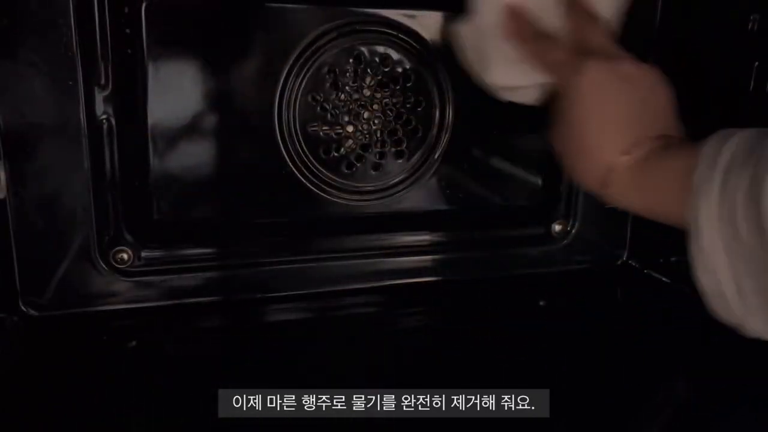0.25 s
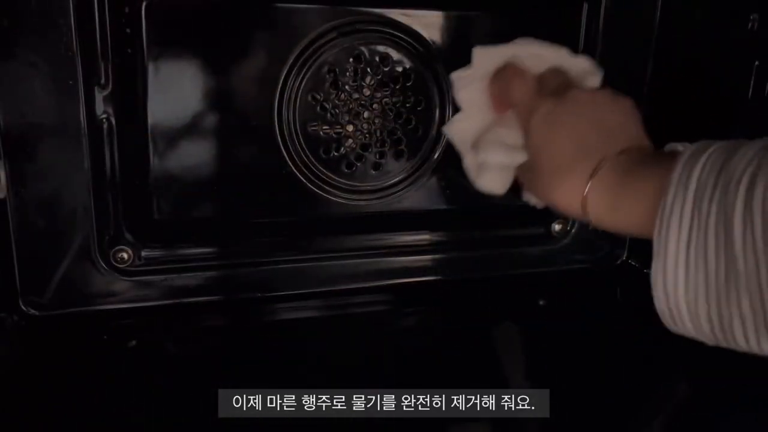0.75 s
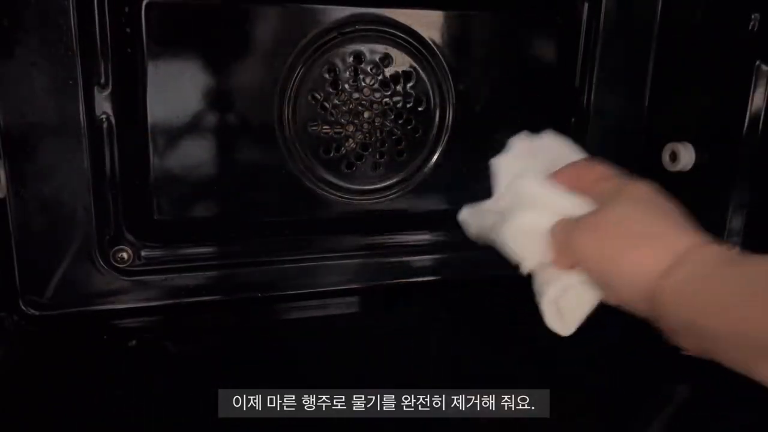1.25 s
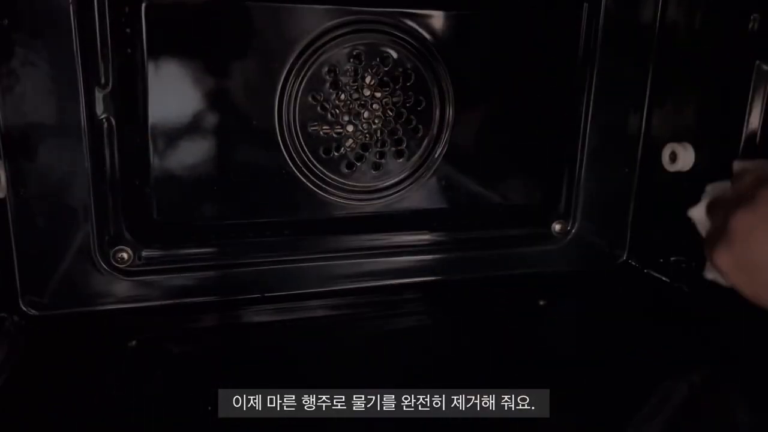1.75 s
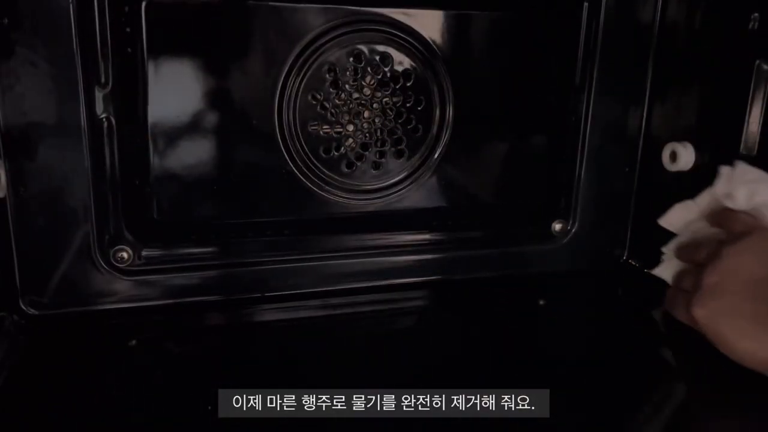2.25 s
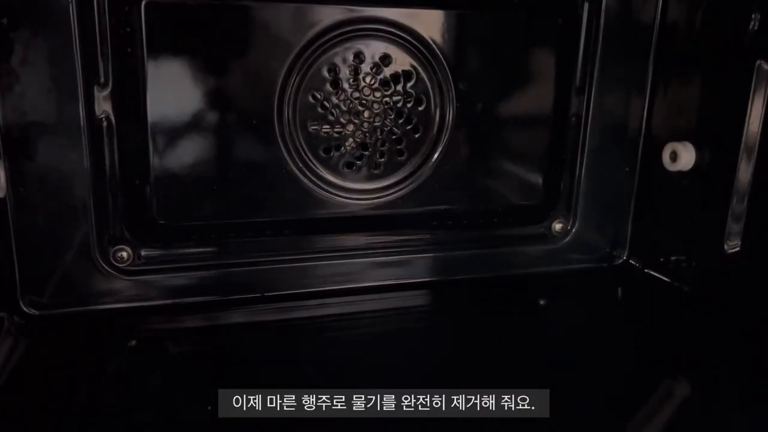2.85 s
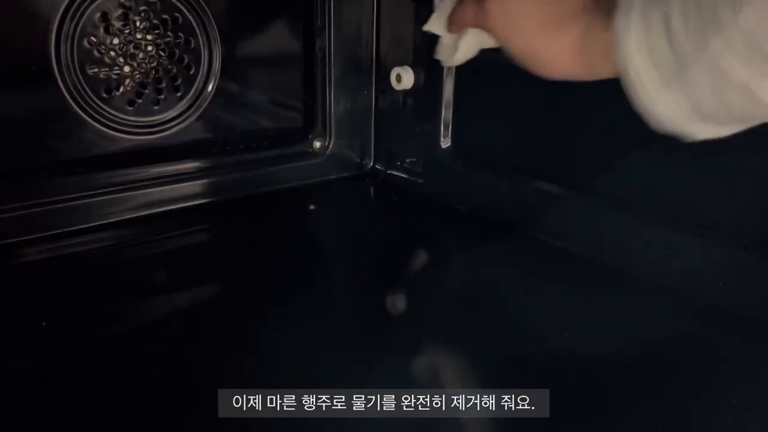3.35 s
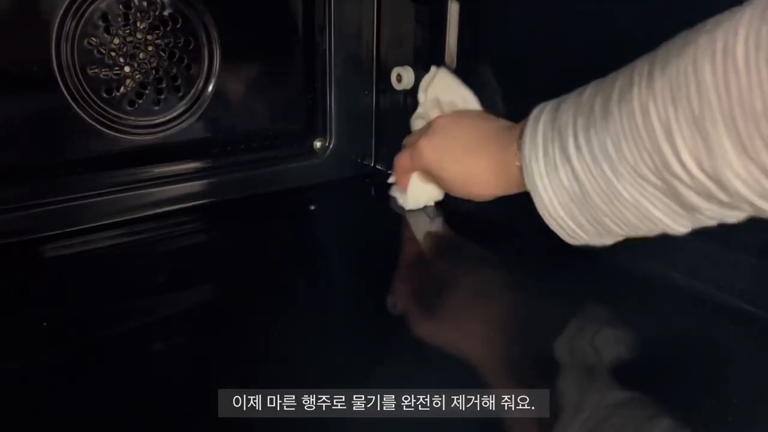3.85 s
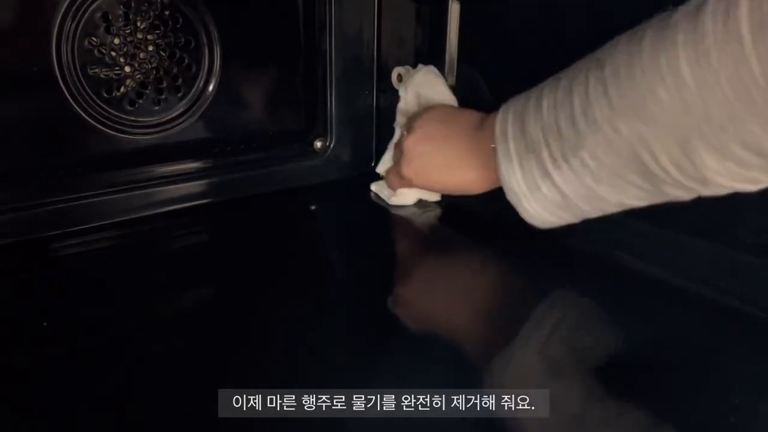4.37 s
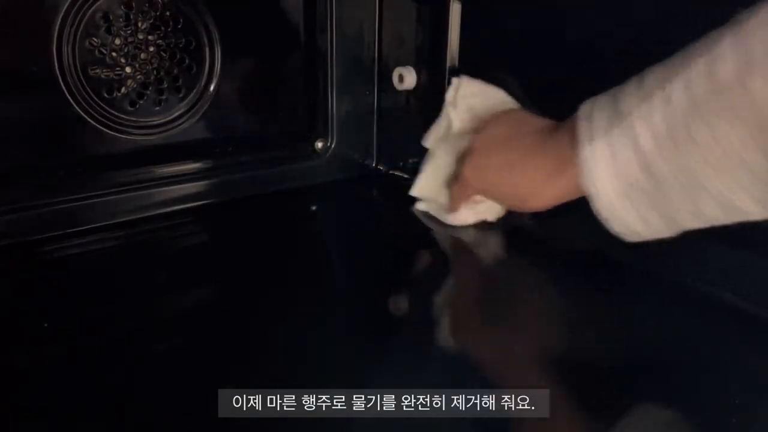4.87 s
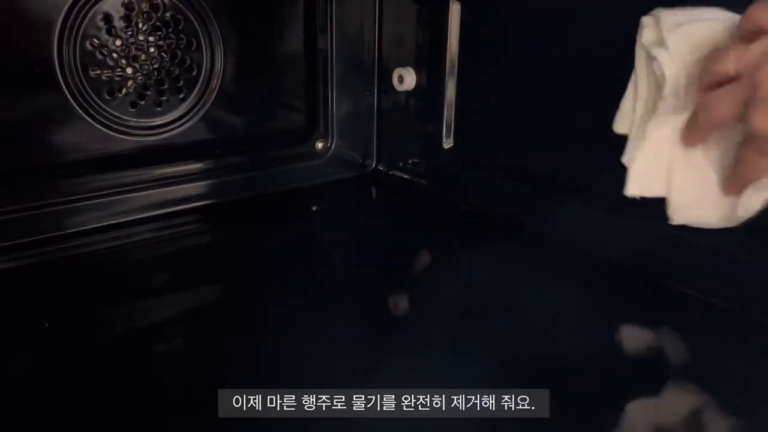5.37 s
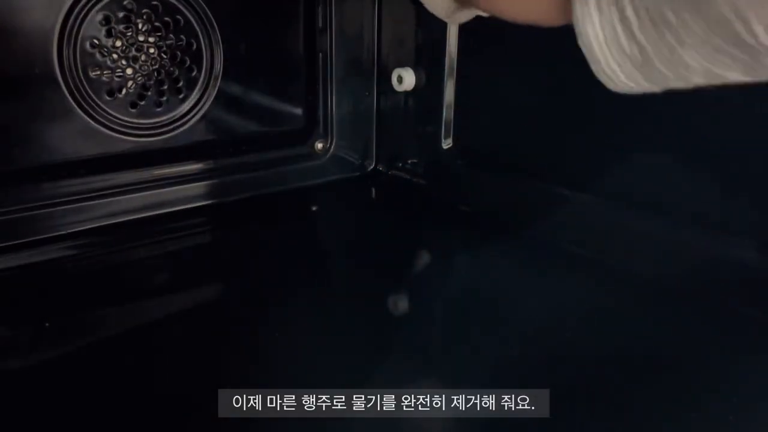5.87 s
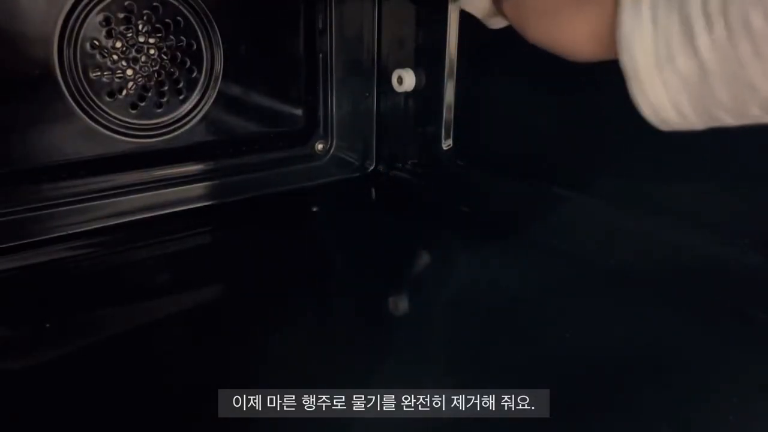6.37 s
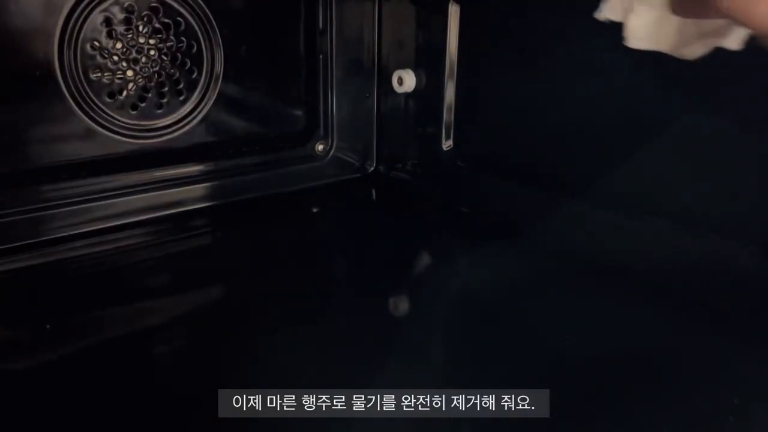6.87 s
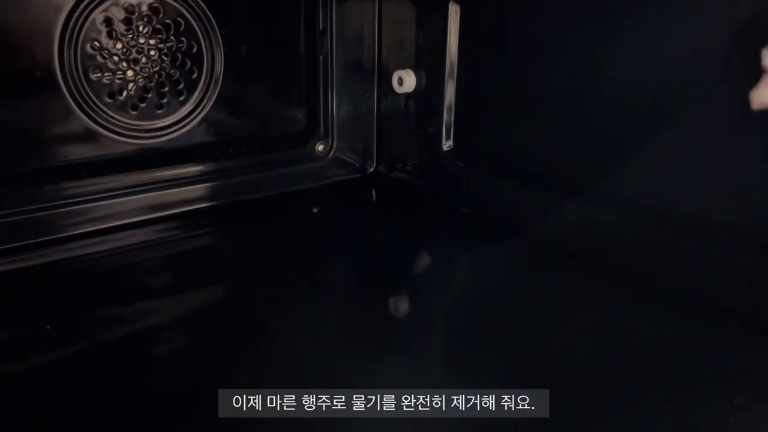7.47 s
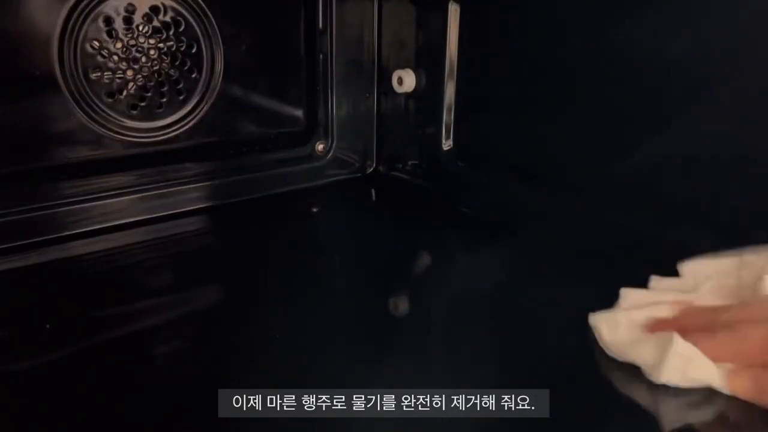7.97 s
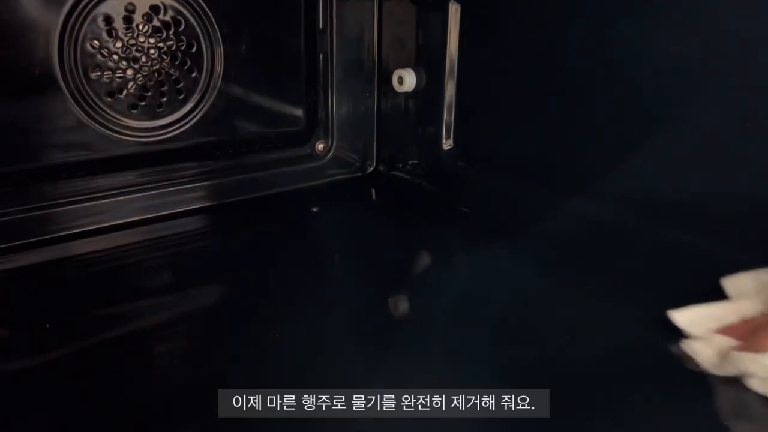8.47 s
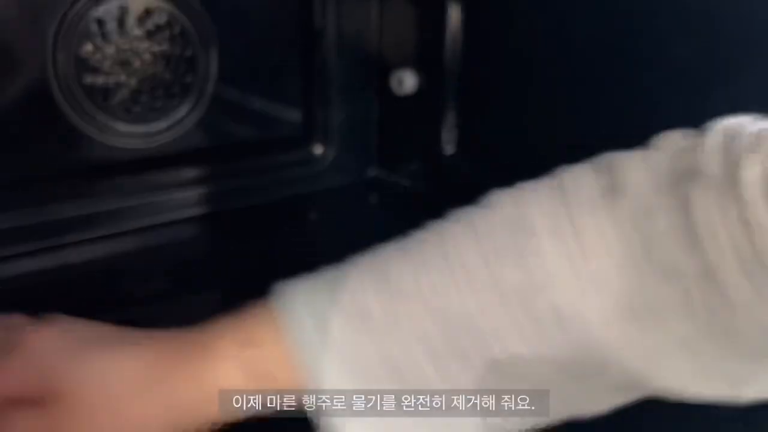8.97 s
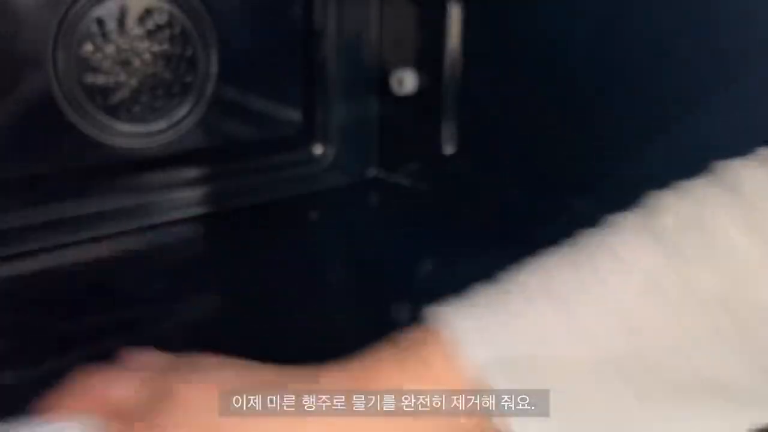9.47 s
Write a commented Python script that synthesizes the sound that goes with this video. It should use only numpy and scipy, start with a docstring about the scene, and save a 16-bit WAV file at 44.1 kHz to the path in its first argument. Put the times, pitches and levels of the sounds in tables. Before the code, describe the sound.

A dry cloth rubs the inside of an enamelled metal oven in short hissing strokes, with hollow bumps, a sharp slap and one heavy thud.

```python
"""Inside an enamelled steel oven, a dry cloth wiped by hand, two microphone ports close by, still kitchen behind.
From the start, strokes of slipping fibres hiss and rumble the panels; folds scuff and snap, fibres whistle,
and the padded hand bumps the walls. Near 2.9 s a hard catch comes with a slap on the ringing side wall.
Near 6.7 to 7 s the hand scrapes and rings the roof; near 8 s it thuds heavily on the floor of the oven,
near 8.6 s something hard on it taps the enamel, and wiping goes on to the end."""
import sys
import numpy as np
from scipy import signal
from scipy.fft import rfft, irfft, next_fast_len
from scipy.io import wavfile
from scipy.ndimage import uniform_filter1d

SR = 44100
rng = np.random.default_rng(int(sys.argv[2]) if len(sys.argv) > 2 else 0)


def store_pcm(level_fs):
    """Save levels as 16-bit WAV."""
    pcm = np.round(np.clip(level_fs, -1, 1) * 32767).astype(np.int16)
    wavfile.write(sys.argv[1], SR, np.atleast_2d(pcm).T)


N = 429093
TIME = np.arange(N) / SR


def undb(db):
    """Decibels to gain."""
    return 10 ** (np.asarray(db) / 20)


def unit(x):
    """Scale to rms 1."""
    return x / np.sqrt(np.mean(x ** 2))


def shape(points, hz):
    """Gain of a (Hz, dB) spectrum at given frequencies, interpolated over log frequency."""
    knots, db = np.transpose(points)
    return undb(np.interp(np.log(hz + 1), np.log(knots), db))


def filtered(x, response):
    """Pass x through a response given as a function of frequency."""
    size = next_fast_len(x.shape[-1] + 8192)
    hz = np.arange(size // 2 + 1) * SR / size
    return irfft(rfft(x, size) * response(hz), size)[..., :x.shape[-1]]


def colour(x, points):
    """Give x a smooth spectrum."""
    return filtered(x, lambda hz: shape(points, hz))


def resonate(x, peaks):
    """Parallel resonances, each applied twice for steep skirts."""
    def response(hz):
        total = 0
        for f, width, db in peaks:
            once = 1j * hz * 1.5 * width / (f * f - hz * hz + 1j * hz * 1.084 * width)
            total = total + undb(db) * once ** 2
        return total
    return filtered(x, response)


def ring(modes, t, scatter=1):
    """Decaying modes after a blow, peak 1; with no scatter they all start from rest together."""
    y = np.zeros(len(t))
    for hz, db, t60 in modes:
        phase = scatter * rng.random()
        y += undb(db - 60 * t / t60) * np.sin(2 * np.pi * (hz * t + phase))
    return y / np.abs(y).max()


def add(track, s, sound):
    """Mix a sound into a track at time s."""
    i = max(int(s * SR), 0)
    track[i:i + len(sound)] += sound[:N - i]


def walk(rate):
    """Smooth random wander with a spread near 1, given new targets at a rate per second."""
    knots = rng.standard_normal(4096)
    return 1.27 * np.interp(TIME * rate, np.arange(len(knots)), knots)


def slips(rate, spread_db, size):
    """Tiny stick-slip clicks of uneven strength, rate per second, rms 1."""
    hit = rng.random(size) < rate / SR
    return unit(hit * rng.standard_normal(size) * undb(spread_db * rng.standard_normal(size)))


def speed(start, length, fastest):
    """In each stroke the hand speeds up from rest to 1 and slows to rest again."""
    crest = start + length * np.clip(fastest, .05, .95)
    return np.sin(np.pi / 2 * np.interp(TIME, [start, crest, start + length], [0, 1, 0]))


# Strokes of the cloth over the enamel. Each row: start in seconds, length in seconds, fastest point as a share
# of the length, fibre hiss in dB, then relative to it in dB: finest fibres, drag in the cavity, load on the wall.
STROKES = [(-0.08, 0.32, 0.22, -58.5, 1, 1.5, 1.5), (0.224, 0.51, 0.64, -60, -1, 2.5, 7),
           (0.687, 0.2, 0.38, -57.5, -2, 0.5, 4), (0.852, 0.31, 0.54, -60, -2.5, 2, 4.5),
           (1.095, 0.4, 0.13, -68.5, 8.5, 2.5, 8), (1.41, 0.49, 0.24, -61.5, 0, 0.5, 5),
           (1.796, 0.26, 0.19, -70, 5, 2.5, 8), (1.96, 0.17, 0.88, -68, -5, 11, 9),
           (2.04, 0.32, 0.31, -61.5, 2.5, -1, 5.5), (2.285, 0.74, 0.21, -59.5, 2, 1.5, 4),
           (2.728, 0.31, 0.12, -63, 0, 3, 4), (3.011, 0.26, 0.059, -64.5, 4.5, -6, -23),
           (3.173, 0.35, 0.53, -65.5, 1.5, 2, -18), (3.513, 0.2, 0.5, -60, 1, 5.5, 9),
           (3.613, 0.51, 0.94, -62, -2, 2.5, 5), (4.097, 0.37, 0.18, -61, -3.5, 2.5, 8),
           (4.456, 0.43, 0.45, -66.5, -1, 7.5, 7.5), (4.77, 0.91, 0.27, -60.5, -3, 1, 3.5),
           (5.382, 0.39, 0.72, -57.5, -0.5, 2, 4.5), (5.746, 0.3, 0.08, -76.5, 7.5, 10, 14),
           (5.959, 0.16, 0.24, -64.5, 0, -14, 9.5), (6.106, 0.54, 0.6, -63, -3, 0, 5),
           (6.647, 0.087, 0.4, -60.5, 8.5, 7, 8), (6.7, 0.65, 0.22, -68.5, 0, 5.5, 11),
           (7.19, 0.38, 0.94, -59.5, -4.5, -2.5, 2.5), (7.548, 0.25, 0.47, -64.5, 6.5, 8, 7),
           (7.902, 0.32, 0.29, -61, 3, 4, 11.5), (8.198, 0.33, 0.7, -59.5, 1.5, 1.5, 7),
           (8.439, 0.41, 0.54, -56.5, -1.5, 1, 0.5), (8.8, 0.27, 0.87, -56.0, 0.5, -3.5, -5),
           (9.036, 0.35, 0.3, -56.0, 0, -1.5, 2), (9.272, 0.32, 0.35, -55, 0.5, -5.5, -3),
           (9.556, 0.33, 0.39, -55.5, 2, -1, -1)]
# hiss and drag grow with the hand's speed to this power; the walls shake even when it is slow
RUB_POWER, LOAD_POWER = 0.62, 0.27
# the cloth rustles faintly in the hand even between strokes
REST_FINE_DB, REST_DRAG_DB, REST_LOAD_DB = -72, -83, -71.5


def effort():
    """Gains of hiss, finest fibres, drag and wall load: each follows the hand's speed, stroke by stroke."""
    hiss = np.zeros(N)
    fine, drag, load = (np.full(N, undb(db) ** 2) for db in (REST_FINE_DB, REST_DRAG_DB, REST_LOAD_DB))
    for start, length, fastest, db, fine_db, drag_db, load_db in STROKES:
        v = speed(start, length, fastest)
        moving = v > 0
        rub = undb(db) * v[moving] ** RUB_POWER
        push = undb(db) * v[moving] ** LOAD_POWER
        # overlapping strokes add as power
        hiss[moving] += rub ** 2
        fine[moving] += (rub * undb(fine_db)) ** 2
        drag[moving] += (rub * undb(drag_db)) ** 2
        load[moving] += (push * undb(load_db)) ** 2
    return np.sqrt([hiss, fine, drag, load])


# Hiss of the slipping fibres, then of the finest. Each row: frequency in Hz, density in dB per Hz.
FIBRE_SPECTRUM = [(600, -12.5), (1000, 2.5), (1500, 2), (2000, 4.5), (2800, 5.5), (3800, 2), (5200, -1),
                  (7000, -8.5), (9000, -16.5), (16000, -41)]
FINE_FIBRE_SPECTRUM = [(4000, -6), (6500, 0.5), (8500, 0.5), (9300, 5.5), (10200, 1), (11300, 1),
                       (12400, 4), (14700, 3.5), (16000, -6)]
# Resonances under the cloth: air in the cavity, wall chatter, panel boom.
# Each row: frequency in Hz, nominal width in Hz, relative level in dB.
CAVITY = [(533, 113, 5.5), (611, 156, -2), (800, 98, 2.5), (950, 130, 0.5), (1170, 250, -7.5),
          (1258, 490, -6.5)]
CHATTER = [(227.5, 48, 2.5), (287.6, 38, 3), (320.5, 69, 5), (363, 79, -2.5), (431, 12, 1.5)]
BOOM = [(84, 65, -2.5), (117.7, 24.7, 2.5), (156.5, 6.1, -4.5), (194.6, 7.7, -8)]
# the panels' boom against their chatter, and its uneven swell as the wad rolls
BOOM_DB, BOOM_SWELL_DB, ROLL_PER_S = 2, -1, 7.1


def wiping():
    """Fibres hiss as they slip; the uneven drag of the wad shakes the walls and the air between them."""
    hiss_gain, fine_gain, drag_gain, load_gain = effort()
    grip = walk(35)
    fibres = slips(16000, 0.96, N) * undb(0.7 * grip)
    drag = slips(4000, 1.8, N) * undb(1.0 * grip)
    hiss = unit(colour(fibres, FIBRE_SPECTRUM)) * hiss_gain
    fine = unit(colour(fibres, FINE_FIBRE_SPECTRUM)) * fine_gain * undb(-0.25)
    hollow = unit(resonate(drag, CAVITY)) * drag_gain
    chatter = unit(resonate(drag, CHATTER)) * load_gain
    swell = undb(BOOM_DB + BOOM_SWELL_DB * walk(ROLL_PER_S))
    boom = unit(resonate(drag, BOOM)) * load_gain * swell
    return hiss + fine + hollow + chatter + boom


# Strokes that sing in one resonance.
# Each row: start in seconds, end in seconds, frequency in Hz, nominal width in Hz, level in dB.
SWISHES = [(0.071, 0.184, 800, 350, -58), (0.397, 0.42, 756, 150, -32.5), (0.431, 0.69, 650, 378, -54),
           (2.099, 2.42, 5870, 1200, -68), (2.854, 2.896, 960, 1140, -34), (2.86, 2.892, 3200, 2800, -39),
           (2.862, 2.908, 580, 330, -36), (2.88, 2.964, 1080, 800, -42.5),
           (3.737, 3.908, 5040, 1100, -62.5), (3.868, 4.047, 5070, 1500, -58),
           (4.039, 4.067, 2200, 1800, -52.5), (4.06, 4.6, 1370, 1500, -68.5),
           (4.237, 4.403, 13800, 2200, -58), (4.85, 5.7, 1123, 110, -65), (5.052, 5.805, 1590, 1310, -66),
           (5.404, 5.785, 2700, 450, -60.5), (5.946, 6.544, 5700, 1420, -68.5),
           (7.237, 7.435, 4460, 2500, -68), (7.615, 7.8, 1293, 90, -60), (7.949, 7.989, 1100, 1600, -41),
           (8.599, 8.8, 1300, 500, -60), (8.663, 8.8, 56.7, 35, -45), (9.233, 9.493, 4800, 1190, -59)]


def swishes():
    """The pocket between hand and wall picks one band out of the rubbing for the length of a stroke."""
    out, t = np.zeros(N), TIME[:SR]
    for start, end, hz, width, db in SWISHES:
        rub = unit(resonate(slips(12000, 0.85, SR), [(hz, width, 0)]))
        arch = np.sin(np.pi * np.clip(t / max(end - start, .02), 0, 1))
        add(out, start, undb(db) * arch * rub)
    return out


# The cloth catches and scuffs. Each row: start in seconds, level in dB, hollow pitch in Hz,
# wall chatter and hiss in relative dB before trims, decay of the hiss by 60 dB in seconds.
SCUFFS = [(0.129, -49, 900, -13, 4.5, 0.13), (0.244, -35.5, 790, -18, -17, 0.06),
          (0.284, -42, 790, -20, -21, 0.051), (0.303, -45, 820, -20, -20, 0.06),
          (0.342, -48, 1000, -13, -11, 0.06), (0.347, -45.5, 620, 7, -14, 0.089),
          (0.397, -39, 690, 3.5, -10, 0.09), (0.412, -39.5, 696, 3.5, -16, 0.1),
          (0.452, -46, 560, 4, -18, 0.1), (0.537, -43, 664, 2, -14, 0.12),
          (0.563, -46, 675, 3.5, -20, 0.08), (1.056, -44.5, 730, -0.5, -7, 0.1),
          (1.312, -48.5, 1170, 6.5, -8, 0.19), (1.457, -61.5, 694, 12.5, 0, 0.45),
          (1.536, -65.5, 634, 21, 9, 0.26), (2.021, -50.5, 633, 13, -3, 0.037),
          (2.077, -45.5, 877, -5, -11, 0.065), (2.128, -47, 795, 5.5, -1.5, 0.16),
          (2.156, -47.5, 720, 16, -6, 0.055), (2.747, -53, 1200, -22, -3, 0.06),
          (2.876, -19, 560, -10.5, -8, 0.081), (2.909, -35, 1060, -12, -15, 0.19),
          (2.944, -38, 700, -14, -28, 0.15), (3.393, -56, 900, 13.5, -18, 0.23),
          (3.535, -52.5, 620, 10.5, -16, 0.087), (3.84, -55, 604, 9.5, -12, 0.087),
          (4.06, -44, 640, 7.5, -15, 0.089), (4.211, -52, 700, 6, -12, 0.099),
          (4.734, -64, 595, 19, -8, 0.081), (6.668, -36, 510, -6, -27, 0.15),
          (6.912, -55, 504, -10, -20, 0.18), (7.715, -44, 660, -14, -22, 0.06),
          (7.754, -40, 675, -6.5, -23, 0.094), (7.816, -45.5, 636, -5, -25, 0.07),
          (7.88, -42.5, 626, -4, -16.5, 0.15), (7.929, -36.5, 665, -12, -30, 0.4),
          (7.963, -28.5, 410, -0.5, -18.5, 0.12)]
# Hiss of a scuff. Each row: frequency in Hz, density in dB per Hz.
SCUFF_SPECTRUM = [(400, -6), (1000, 11), (2200, 17.5), (3100, 17.5), (4500, 11), (7000, 7.5), (9500, 14),
                  (13000, 8), (16000, 9.5)]


def scuffs():
    """A fold catches and lets go: a burst of slips, whose hollow part and wall chatter outlast its hiss."""
    out, t = np.zeros(N), TIME[:SR // 2]
    onset = 1 - np.exp(-t / 0.0019)
    for s, db, hz, chatter_db, hiss_db, t60 in SCUFFS:
        fade_db = -60 * t / t60
        rub = slips(8000, 2.3, len(t))
        chatter = unit(resonate(rub, CHATTER)) * undb(0.8 * fade_db + chatter_db + 2)
        hollow = unit(resonate(rub, [(hz, 0.39 * hz, 0)])) * undb(0.85 * fade_db - 4.0)
        hiss = unit(colour(rub, SCUFF_SPECTRUM)) * undb(fade_db + hiss_db)
        add(out, s, undb(db) * onset * (chatter + hollow + hiss))
    return out


# The hand bumps a panel. Each row: start in seconds, level in dB, settled panel pitch in Hz,
# time to the fullest contact in seconds, after-ring in relative dB before trims.
BUMPS = [(0.003, -37.5, 105, 0.0081, 8), (0.614, -32.5, 104, 0.014, -2), (1.051, -38.5, 105, 0.011, -13),
         (1.32, -27.5, 105.3, 0.019, 5), (1.477, -42, 113, 0.012, 12), (1.57, -35, 122.6, 0.018, 12),
         (1.934, -44, 120, 0.015, -11), (2.141, -34, 113, 0.014, 0), (2.203, -35, 114, 0.012, -15),
         (2.302, -40, 112, 0.013, -4), (2.775, -33.5, 99, 0.021, 11.5), (2.962, -38.5, 111, 0.011, -12),
         (3.086, -49, 118, 0.017, 1), (3.173, -47.5, 122.5, 0.027, -6), (3.397, -36.5, 114, 0.017, -2),
         (4.064, -41, 119.3, 0.017, -14), (5.058, -43.5, 119, 0.022, 6), (5.865, -39, 90, 0.024, -2),
         (6.034, -46, 106, 0.015, -2), (7.963, -3.5, 124, 0.017, 1), (8.083, -30, 121, 0.015, -16),
         (8.129, -30.5, 104, 0.0069, -15), (8.355, -38.5, 164, 0.01, -16), (8.57, -43.5, 139, 0.0049, -14),
         (8.68, -38, 65.6, 0.0097, -12)]
# a pressed panel starts sharp and settles: share of its pitch, extra share per dB of weight, settling time
BEND, BEND_PER_DB, SETTLE_S = 0.11, 0.01, 0.019


def bumps():
    """The padded hand loads a panel over a few cycles; panel and cavity hum on."""
    out, t = np.zeros(N), TIME[:SR // 2]
    for s, db, hz, contact_s, after_db in BUMPS:
        load = t / contact_s * np.exp(1 - t / contact_s)
        weight_db = max(db + 21.5, 0)
        # its weight starts the pitch sharp, and it falls as the panel settles
        bend = BEND + BEND_PER_DB * weight_db
        cycles = hz * (t + bend * SETTLE_S * (1 - np.exp(-t / SETTLE_S)))
        # a heavier hand gives a more compact thud and a weaker after-ring
        thud = load ** (1.12 + 0.38 * weight_db) * np.sin(2 * np.pi * cycles)
        hum_modes = [(hz, -3, .2), (134, 0, .42), (178, -12, .3), (72, -7, .2)]  # Hz, dB, t60 in s
        after = ring(hum_modes, t, scatter=False) * (1 - np.exp(-t / 0.018))
        after_gain = undb(after_db - 4.5 - 0.36 * weight_db)
        add(out, s, undb(db) * (thud + after_gain * after))
    return out


# Knocks on the roof. Each row: start in seconds, level in dB before trims, bright scrape in relative dB,
# scrape decay by 60 dB in seconds, share of its ring time the hand leaves the sheet, fittings in relative dB.
KNOCKS = [(6.668, -44.5, -23, 0.2, 0.18, -5), (6.686, -39, -19, 0.082, 1, -9),
          (6.853, -54, 1.5, 0.42, 0.73, -6), (6.91, -43.5, -7.5, 0.09, 0.87, -16),
          (6.982, -24, -8, 0.095, 0.97, -14.5)]
# The roof sheet, then its thin fittings.
# Each row: frequency in Hz, relative level in dB, decay by 60 dB in seconds.
ROOF_MODES = [(116.3, 0, 0.24), (179.2, -8, 0.53), (282, 0, 0.47), (293.4, -2.5, 0.52), (361.6, -2, 0.25),
              (580, 3, 0.14), (630.4, -8, 0.52), (659.5, -6, 0.43), (830, -23.5, 0.2)]
FITTING_MODES = [(5120, 5, 0.18), (5652, -7, 0.1), (6200, -8, 0.12), (6691, -1, 0.1), (6880, -2, 0.13),
                 (7510, -5, 0.1), (7675, -6, 0.1)]
# Scrape along the roof. Each row: frequency in Hz, density in dB per Hz.
SCRAPE_SPECTRUM = [(800, -2), (1700, -0.5), (3300, -6), (4300, -13), (6000, 1.5), (6900, 5), (7800, -16),
                   (9200, 12.5), (12000, -15), (16000, -12)]


def knocks():
    """The hand scrapes the roof brightly and rings its sheet and fittings; staying there, it damps the sheet."""
    out, t = np.zeros(N), TIME[:SR]
    for s, db, scrape_db, t60, free, fittings_db in KNOCKS:
        damped = [(hz, mode_db, ring_s * free) for hz, mode_db, ring_s in ROOF_MODES]
        sheet = ring(damped, t) * (1 - np.exp(-t / 0.005))
        rub = slips(8000, 2.6, len(t))
        # the scrape also sings in the thin fittings, and its push shakes the walls
        singing = unit(resonate(rub, [(6840, 410, 2), (7520, 460, 0)]))
        scrape = unit(colour(rub, SCRAPE_SPECTRUM)) + 0.68 * singing
        fittings = ring(FITTING_MODES, t) * undb(fittings_db) * (1 - np.exp(-t / 0.004))
        shake_fade = undb(-10.5 - 60 * t / 0.52) * (1 - np.exp(-t / 0.0087))
        shake = unit(resonate(rub, CHATTER + BOOM)) * shake_fade
        fade = undb(scrape_db + 1.5 - 60 * t / t60) * (1 - np.exp(-t / (0.027 * t60)))
        add(out, s, undb(db + 8.5) * sheet + undb(db) * (scrape * fade + fittings + shake))
    return out


# The side wall. Each row: frequency in Hz, relative level in dB, decay by 60 dB in seconds.
SIDE_WALL_MODES = [(325, -2.5, 0.13), (522, -2, 0.12), (657, 1, 0.17), (810, -4, 0.16), (1295, -6.5, 0.15),
                   (1565, -20, 0.25), (2240, -20, 0.2), (2854, -16, 0.11), (3290, -12, 0.11),
                   (5320, -10, 0.083), (8764, -6, 0.08), (12800, -16, 0.05)]
SLAP_S, SLAP_DB = 2.877, -18


def slap():
    """The wad lands flat on the side wall, which rings briefly."""
    out, t = np.zeros(N), TIME[:SR // 2]
    add(out, SLAP_S, undb(SLAP_DB) * ring(SIDE_WALL_MODES, t) * (1 - np.exp(-t / 0.002)))
    return out


# A taut fold snaps off the enamel. Each row: start in seconds, peak in dB.
SNAPS = [(0.135, -38), (0.342, -35), (0.403, -31), (1.311, -29), (1.432, -38.5), (2.746, -26.5),
         (2.768, -32), (2.877, -13), (4.057, -34), (7.928, -29.5)]
# Colour of a snap. Each row: frequency in Hz, density in dB per Hz.
SNAP_SPECTRUM = [(300, -2), (900, 25), (3000, 14.5), (6500, 12), (9000, 7), (16000, 12)]
SNAP_T60_S = 0.034


def snaps():
    """A taut fold lets go all at once: a few milliseconds of bright slips."""
    out, t = np.zeros(N), TIME[:SR // 8]
    for s, db in SNAPS:
        rub = slips(9000, 2.5, len(t))
        burst = colour(rub * undb(-60 * t / SNAP_T60_S), SNAP_SPECTRUM)
        add(out, s, undb(db) * burst / np.abs(burst).max())
    return out


# A hard tap on the floor of the oven, and its rattle. Each row: start in seconds, level in dB.
TAPS = [(8.569, -31), (8.572, -25), (8.575, -32), (8.586, -45)]
# What the tap rings with. Each row: frequency in Hz, relative level in dB, decay by 60 dB in seconds.
TAP_MODES = [(1320, -0.5, 0.056), (1700, -4, 0.03), (2250, -3, 0.02), (2550, 2, 0.02), (2990, -1, 0.018),
             (3260, -3, 0.02), (7000, -15, 0.04)]
# Its dry crack. Each row: frequency in Hz, density in dB per Hz.
CRACK_SPECTRUM = [(300, -5), (1200, -7), (2800, 2), (4200, -15), (7000, -9), (16000, -10)]


def taps():
    """Something hard on the hand rattles against the enamel: dry cracks with hardly any ring."""
    out, t = np.zeros(N), TIME[:SR // 4]
    for s, db in TAPS:
        crack = unit(colour(rng.standard_normal(len(t)), CRACK_SPECTRUM)) * undb(-11 - 60 * t / 0.033)
        add(out, s, undb(db) * (ring(TAP_MODES, t) + crack))
    return out


# Fibres whistle faintly on the enamel. Each row: start in seconds, length in seconds,
# first, middle and last pitch in Hz, level in dB.
WHISTLES = [(0.65, 0.07, 13500, 13600, 13650, -67), (0.88, 0.056, 14600, 14200, 13800, -70),
            (1.405, 0.11, 14900, 13750, 13000, -63), (1.425, 0.06, 15000, 14600, 14100, -66),
            (1.49, 0.08, 14700, 13900, 13550, -64), (3.75, 0.07, 12800, 13400, 13700, -66),
            (3.835, 0.067, 13700, 14650, 14350, -60), (3.89, 0.1, 14600, 14350, 14900, -65),
            (5.29, 0.06, 13000, 13350, 13150, -66), (5.4, 0.09, 15300, 14900, 14300, -66),
            (7.269, 0.08, 13900, 15000, 15700, -67), (7.278, 0.08, 12100, 12950, 13600, -70),
            (7.336, 0.1, 13500, 13750, 13200, -63), (7.34, 0.09, 12550, 12700, 12200, -69),
            (7.466, 0.09, 15300, 14200, 13900, -56)]


def whistles():
    """Thin stick-slip tones that glide through three pitches, wavering."""
    out, t = np.zeros(N), TIME[:SR // 2]
    for s, length, first, middle, last, db in WHISTLES:
        along = np.clip(t / length, 0, 1)
        glide = np.polyval(np.polyfit([0, .5, 1], [first, middle, last], 2), along)
        hz = glide + 80 * walk(900)[:len(t)]
        add(out, s, undb(db) * np.sin(np.pi * along) * np.sin(2 * np.pi * np.cumsum(hz) / SR))
    return out


# Puffs of air at the microphone ports. Each row: frequency in Hz, density in dB per Hz.
PUFF_SPECTRUM = [(15, -5), (40, -1), (70, 22), (130, 2), (300, -22), (1000, -78)]


def puffs(thuds, db):
    """Each bump pushes a little air past the ports, differently at each."""
    push = uniform_filter1d(np.abs(thuds), SR // 30)
    return undb(db) * push * unit(colour(rng.standard_normal((2, N)), PUFF_SPECTRUM))


def dense_tails(x, t60, count=300):
    """Dense, short noise tails, separate in each channel and drawn afresh for each short overlapping piece."""
    out, t, hop = np.zeros((2, N)), TIME[:4096], N // count
    for start in range(-hop, N, hop):
        a, b = max(start, 0), min(start + 2 * hop, N)
        piece = x[a:b] * np.sin(np.pi * (np.arange(a, b) - start) / (2 * hop))
        for channel in out:
            tail = rng.standard_normal(len(t)) * undb(-60 * t / t60)
            add(channel, a / SR, signal.fftconvolve(piece, tail / np.linalg.norm(tail)))
    return out


# Spread of the sound between channels, against the shared part; nearly none around 9 to 11 kHz.
# Each row: frequency in Hz, relative level in dB.
SPREAD_SPECTRUM = [(100, -24), (330, -4.5), (650, 6), (1400, 7.5), (3000, 4), (5500, 6), (7500, 2),
                   (9000, -18.5), (10900, -49), (11400, 6.5), (16000, -8.5)]
# Left channel minus right. Each row: frequency in Hz, difference in dB.
BALANCE = [(100, 0.5), (380, -1), (700, 4.5), (1200, -1), (2400, 2), (3500, 2.5), (5200, 8.5), (6500, 5.5),
           (7600, 3), (8600, 1), (9300, -1.5), (11000, 1), (16000, -1.5)]


def oven(x):
    """Both channels share the sound, and each adds its own short dense tail to spread it."""
    both = x + colour(dense_tails(x, t60=.08), SPREAD_SPECTRUM)

    def response(hz):
        sides = shape(BALANCE, hz) ** np.array([[.5], [-.5]])
        # hold the level of the shared and spread parts together
        return sides / np.hypot(1, shape(SPREAD_SPECTRUM, hz))
    return filtered(both, response)


# Stereo phase, left against right; the channels are opposed around 10 kHz.
# Each row: frequency in Hz, phase in turns.
STEREO_PHASE = [(100, 0), (300, .02), (600, .24), (1200, .1), (2500, .05), (8400, 0), (9200, .5),
                (10950, .5), (11300, 1)]


def stereo_phase(x):
    """Turn the phase of the left channel against the right, by an amount that depends on frequency."""
    def response(hz):
        turns = np.interp(hz, *np.transpose(STEREO_PHASE))
        return np.exp(-2j * np.pi * turns * np.array([[1], [0]]))
    return filtered(x, response)


# Air of the still kitchen. Each row: frequency in Hz, density in dB per Hz.
KITCHEN_SPECTRUM = [(20, -12), (40, 9.5), (60, 20.5), (120, 16.5), (200, 6.5), (500, 0.5), (1000, -8.5),
                    (3000, -12.5), (16000, -146)]


def kitchen(db):
    """Quiet room air, partly shared by both ports."""
    air = rng.standard_normal(N) + 0.61 * rng.standard_normal((2, N))
    return undb(db) * unit(colour(air, KITCHEN_SPECTRUM))


# share that reaches the ports without meeting a wall: scuffs, taps, snaps and whistles;
# then the roof, which faces the ports
DIRECT_SHARE, ROOF_DIRECT_SHARE = 0.19, 0.75


def scene():
    """All contacts sound inside the oven, over the still kitchen."""
    cloth = wiping() + swishes()
    thuds, roof = bumps(), knocks()
    hard = scuffs() + taps() + snaps() + whistles()
    inside = oven(cloth + thuds + (1 - DIRECT_SHARE) * hard + (1 - ROOF_DIRECT_SHARE) * roof)
    straight = DIRECT_SHARE * hard + ROOF_DIRECT_SHARE * roof + slap()
    return stereo_phase(inside + straight) + puffs(thuds + roof, db=-17.0) + kitchen(db=-61.5)


TOP_HZ = 15800


def record(dry):
    """The recorder cuts the top steeply."""
    return signal.sosfilt(signal.ellip(10, .2, 80, TOP_HZ, fs=SR, output="sos"), dry)


dry = scene()
out = record(dry)
store_pcm(out)
```